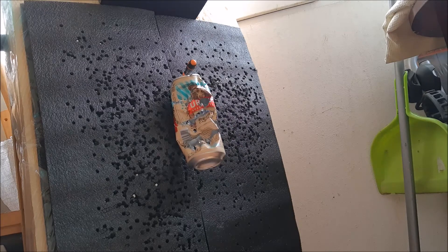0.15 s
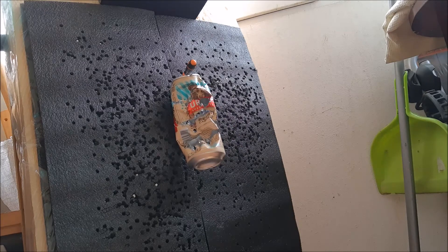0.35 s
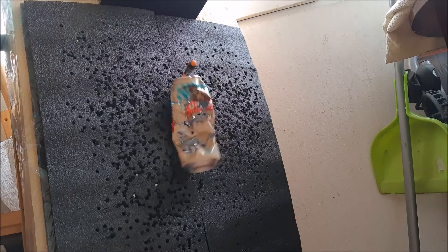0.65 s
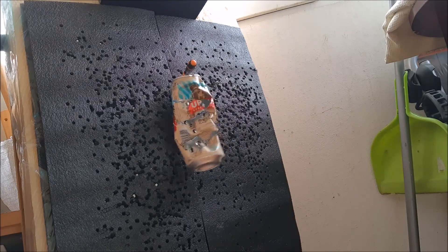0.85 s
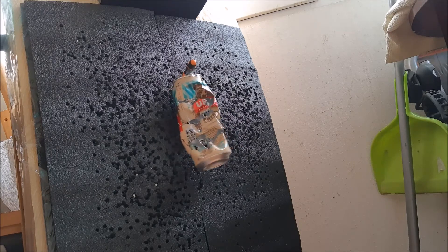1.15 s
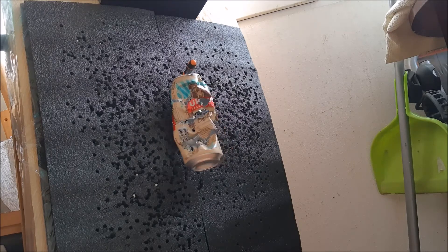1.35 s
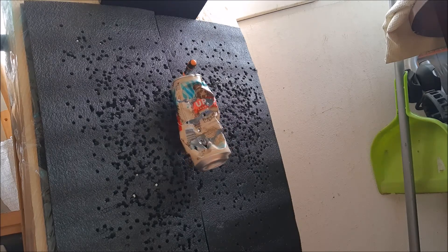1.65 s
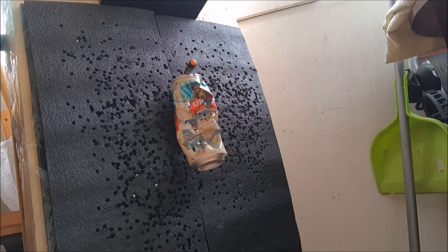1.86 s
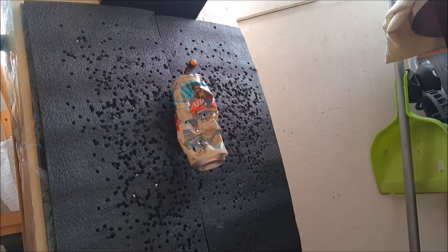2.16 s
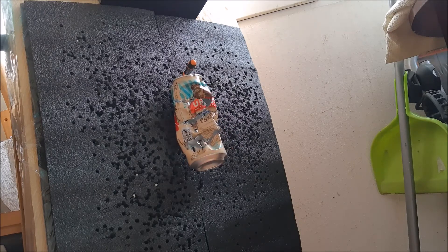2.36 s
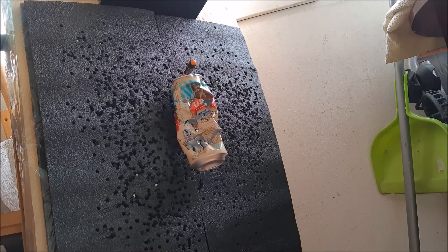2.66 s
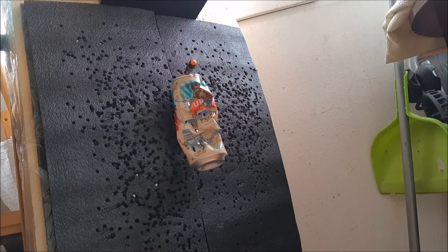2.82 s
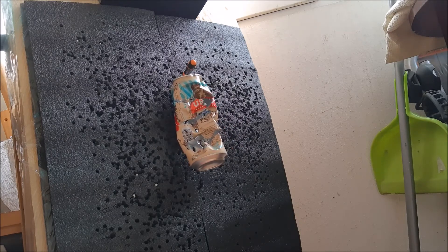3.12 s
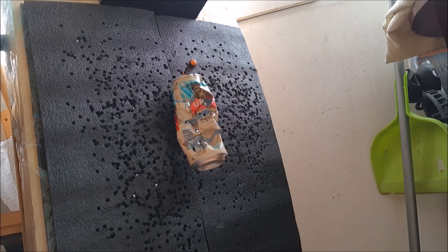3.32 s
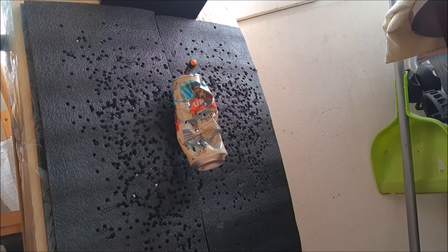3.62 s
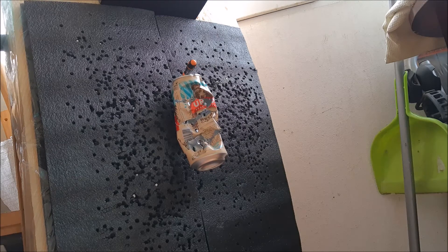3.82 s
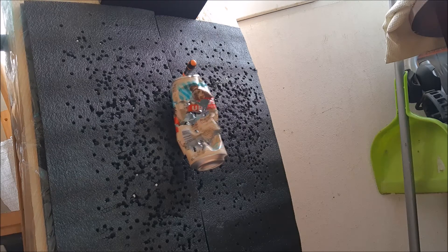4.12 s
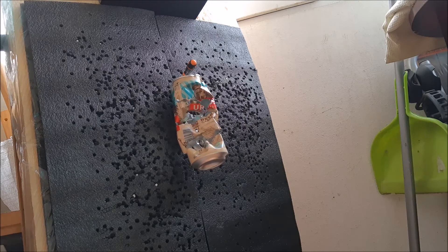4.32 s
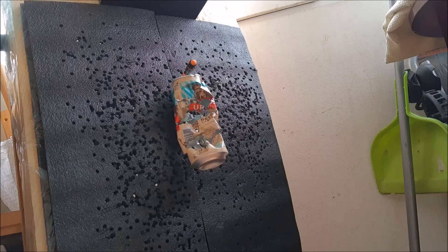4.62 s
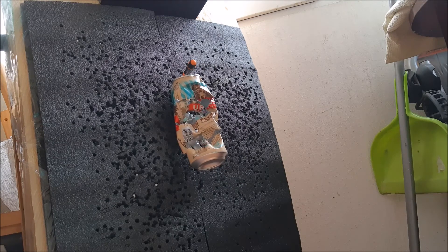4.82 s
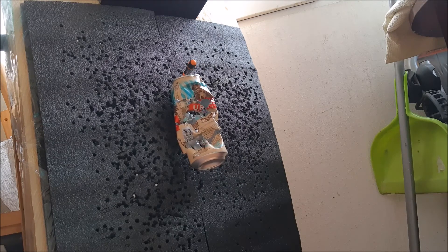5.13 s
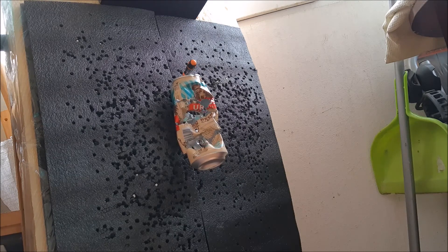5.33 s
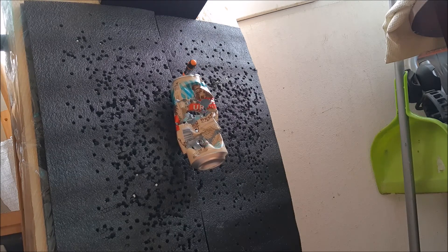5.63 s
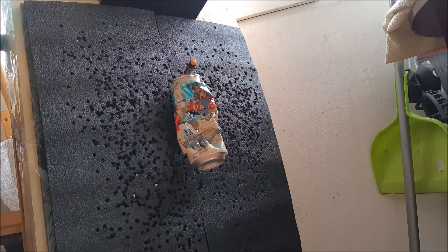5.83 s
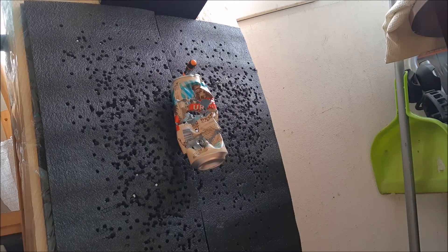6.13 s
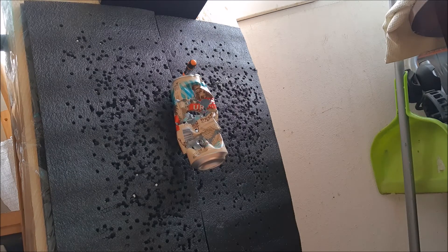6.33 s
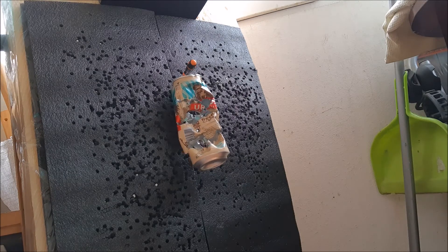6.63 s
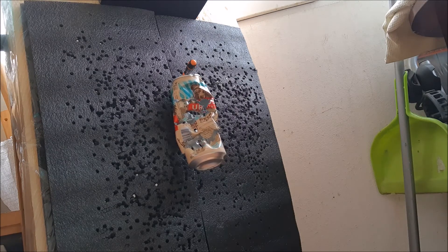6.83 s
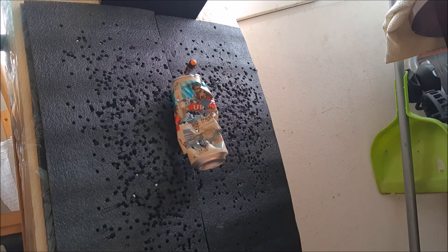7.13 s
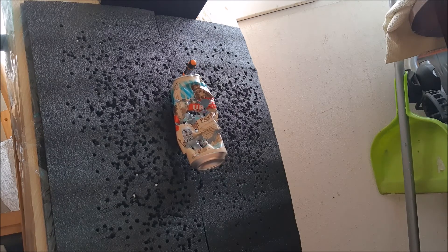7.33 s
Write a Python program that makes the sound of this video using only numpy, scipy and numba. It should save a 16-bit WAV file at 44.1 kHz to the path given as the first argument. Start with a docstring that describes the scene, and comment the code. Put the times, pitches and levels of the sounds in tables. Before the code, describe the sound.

Quiet room tone with a low hum and a few faint clicks opens in a small hard room. At about 0.7 seconds a spring airsoft rifle pops from across the room, and almost instantly the pellet hits a metal can near the microphone with a loud crack, a short clang and a low backstop thump. Scraps rattle brightly inside the can until about 1.2 seconds. Light ticks of bouncing pellets and rifle handling follow, scattered through 3.7 seconds. A barely audible high whine comes and goes between 3 and 4 seconds. The second pop and hit land at 4.2 seconds, followed by more clicks and two soft knocks of a rifle part around 5.5 seconds. The third shot strikes at 6.6 seconds, leaving a slight metallic hum. Each hit briefly overloads the microphone. Faint clicks end it near 7.5 seconds.

```python
"""A spring airsoft rifle fires three pellets across a small hard room at a dented can beside a phone.
Room tone and faint clicks come first. The piston slams with a far pop; 50 ms later the can cracks and
clangs and the backstop thumps. The phone's two spaced ports clip on each hit and its gain ducks.
After the first hit scraps rattle in the can. Pellets bounce and the rifle is handled between shots;
a faint whine comes and goes before the second, and a rifle part knocks twice before the third."""
import sys
import numpy as np
from scipy import signal
from scipy.fft import rfft, irfft
from scipy.io import wavfile
from scipy.ndimage import uniform_filter1d
from numba import njit

SR = 44100
rng = np.random.default_rng(int(sys.argv[2]) if len(sys.argv) > 2 else 0)


def inscribe(sig):
    """Save sig as 16-bit PCM at rate SR to the path in sys.argv[1].

    A 1-D sig is mono; a 2-D sig holds one channel per row.
    Samples are clipped to [-1, 1] before scaling.
    """
    pcm = np.round(np.clip(np.atleast_2d(sig).T, -1, 1) * 32767)
    wavfile.write(sys.argv[1], SR, pcm.astype(np.int16))


N = 329427

# room decay: f/Hz, t60/s
ROOM_T60 = [(60, 0.4), (250, 0.33), (1000, 0.46), (2000, 0.41), (4000, 0.38), (8000, 0.29), (12000, 0.22),
            (14500, .2), (17000, 0.069)]
# likeness of the two ports: f/Hz, share/0-1
PORT_LIKENESS = [(60, 1), (130, .95), (300, 0.91), (700, 0.3), (1500, 0.1), (4000, 0)]
# room tone spectrum: f/Hz, level/dB
AIR_SPECTRUM = [(15, -38.5), (25, -7.5), (107, -5.5), (161, -18), (200, -18.5), (334, -18.5), (404, -14),
                (515, -18), (656, -17), (932, -14), (1990, -26), (2270, -32.5), (11500, -49),
                (12500, -47.5), (15900, -62.5)]
# low noise bands: f/Hz, width/Hz, level/dB
DRONES = [(66, 38, -62.5), (109, 13, -58), (199, 22, -73), (377, 25, -77.5), (453, 37, -68)]
# drone swell: t/s, gain/dB
DRONE_SWELL = [(0, -4), (.5, -5), (2.1, 3.5), (2.5, -4), (3.1, 2), (4.2, 2.5), (5.2, 0.5), (5.9, 3.5),
               (6.5, -0.5), (7.47, 2.5)]
# bounces and handling: t/s, peak/dB, body/dB, top octave/dB, pan L-R/dB, room/dB
CLICKS = [(0.169, -38, -16, -4, -2, -7.5), (0.3482, -42.5, -30, -7, -4, -6),
          (0.4936, -43, -25, -8, -3, -10), (0.608, -43, -31, -10, -6, -5), (1.289, -14, -8, -14, -1.5, -3),
          (1.4572, -41, -26, -32, -21, 9), (1.502, -43, 1.5, -18.5, -12, 15),
          (1.569, -52.5, -10, -34, 10, 9), (1.72, -31, -5.5, -16, -9, 9.5), (1.7555, -36.5, 5, -14, -2, 4),
          (1.8397, -34.5, -2, -28, -7, 16), (1.9017, -21, -8, -12, -2, -3.5),
          (2.3833, -20.5, -12.5, -15.5, -8, -3), (2.569, -43, -13, -15, -9.5, 7.5),
          (2.7028, -40.5, -12, -15.5, -9.5, 11), (2.7572, -21, -12, -16, -7, -3),
          (3.0034, -48, -16.5, -17, -7.5, 5.5), (3.025, -37, -18.5, -9, 1, 3),
          (3.0453, -24, -9.5, -15, -6, 2), (3.2031, -30, -4.5, -21, -8, 8),
          (3.2319, -33.5, 29, -17, -10.5, 2.5), (3.2654, -30, -14, -15, 8, -3),
          (3.4399, -33.5, -24.5, -10, -1, -3.5), (3.556, -40.5, -21.5, -10.5, -12, 5.5),
          (3.671, -54.5, -10, -23, -1, -7), (4.134, -58, -5.5, -18.5, -1.5, 9.5),
          (4.366, -20.5, -30, -12, -2.5, 2), (4.5885, -43.5, -4.5, -11, -0.5, 0),
          (4.6532, -40.5, -16, -18, -1.5, -3), (4.9384, -44.5, 3.5, -20, -3.5, 11),
          (5.0377, -47, -8, -12, -5.5, 9.5), (5.1547, -40, -15, -15, -5, 11.5),
          (5.4133, -44, -19, -10, -11.5, 5.5), (5.4344, -40.5, -22.5, -17.5, -3, 14),
          (5.458, -30, -6, -21.5, 2, 10), (5.625, -44, -9, -17, -7.5, 6),
          (5.6411, -30, 1, -23.5, -2.5, 3.5), (7.115, -52, 3, -17, -5, 18), (7.2749, -48, 10, -25, -11, 13),
          (7.3626, -45.5, -10.5, -14, -13, 15.5)]
# bright click spectrum: f/Hz, level/dB
CLICK_SPECTRUM = [(1470, -13.5), (2500, -8.5), (6100, -3), (8000, -4), (10000, 1.5), (12300, 6.5),
                  (14500, 2.5), (15500, -16), (16000, -19.5)]
# dull click body: f/Hz, level/dB
BODY_SPECTRUM = [(600, -19), (1200, 2), (1800, 2.5), (2800, 0.5), (4000, -4), (6000, -18)]
# rifle shots: t/s, peak/dB, pan L-R/dB
SHOTS = [(0.71, -18, -3.5), (4.1814, -18.5, -4), (6.558, -18.5, -4)]
# piston pop: f/Hz, level/dB
POP_SPECTRUM = [(40, -41), (70, -12), (140, -0.5), (230, -12.5), (530, -4.5), (900, -3.5), (1400, -2.5),
                (2600, -8), (3500, -8.5), (5000, -14), (6500, -7.5), (9500, -8.5), (12500, -11.5),
                (14000, -21.5), (16000, -29.5)]
# pellet on can: t/s, peak/dB, dent f/Hz, dent lift/dB, thump peak/dB, thump f/Hz, hum/dB, pan L-R/dB
HITS = [(0.7611, 14, 1396, 10.5, -8.5, 220, -51, -2), (4.2320, 12.5, 1101, 2, -1, 190, -50.5, -4),
        (6.6083, 10, 2600, 6, -6.5, 168, -30.5, 1.1)]
# first blow: f/Hz, level/dB
SMACK_SPECTRUM = [(100, -25.5), (250, -8.5), (500, -1.5), (1000, -0.5), (2000, -1.5), (3300, -2.5),
                  (5000, -6.5), (9000, -2.5), (12500, -10), (16000, -25.5)]
# tearing sheet, before tilt and dent lift: f/Hz, level/dB
CRACK_SPECTRUM = [(210, -35.5), (350, -7.5), (684, -6.5), (1280, -8.5), (1450, -6), (1700, -10),
                  (1960, -5.5), (3960, -9), (7990, -3.5), (12100, -6), (15900, -32.5)]
# can modes: f/Hz, level/dB, t60/s
CAN_MODES = [(940, -5.5, 0.17), (1040, -1.5, 0.089), (1200, -6, 0.09), (1366, -2.5, 0.12), (1470, -4, 0.14),
             (1597, 1, 0.062), (1649, -3.5, 0.068), (1790, -0.5, 0.091), (2018, -10.5, 0.2),
             (2187, -4.5, 0.11), (2300, -2.5, 0.23), (2600, 0.5, .08), (2950, 0.5, 0.058),
             (3127, -5.5, .08), (3343, -11, .08), (3627, -1, .08)]
# backstop modes: f/Hz, level/dB, t60/s
BACKSTOP_MODES = [(45.5, 1.5, 0.095), (81, -2.5, .09), (133.5, -2, .07), (172, -7, .05), (258, 6, 0.032),
                  (315, -2.5, .05)]
# scrap on the can wall: f/Hz, level/dB
SCRAP_SPECTRUM = [(1500, -26), (2500, -9.5), (3500, -12), (4600, -4.5), (5800, -6.5), (7800, 1),
                  (9500, 0.5), (11000, -3), (13500, -13), (16000, -30)]
# can wall resonances: f/Hz, lift/dB
SCRAP_RESONANCES = [(2400, -3), (4450, 4), (5300, 2), (7600, 5.5), (8800, 0), (10700, 3.5)]
# single scrap strikes: t/s, peak/dB, pan L-R/dB, room/dB
SCRAP_TICKS = [(0.889, -11, 5, -2), (0.9341, -11, 0.5, -2), (0.96, -11.5, 2.5, 2.5), (0.984, -15, 6, 2),
               (0.9981, -11, 1, 1.5), (1.0107, -18, 7, 7), (1.069, -14, 0.5, 5), (1.0826, -20.5, 5, 10),
               (1.1592, -17.5, 18.5, 5)]
# short rings: the can during the rattle, loose parts later: t/s, f/Hz, peak/dB
SHORT_RINGS = [(1.005, 2400, -33), (1.11, 4940, -32), (1.73, 815, -42), (3.21, 5000, -46), (3.21, 3300, -49)]
# rifle latch modes: f/Hz, level/dB
LATCH_MODES = [(1600, 0), (3300, -2)]
# latch knocks: t/s, peak/dB
LATCH_KNOCKS = [(5.459, -43), (5.643, -39)]

TIME_S = np.arange(N) / SR
AGE_S = np.arange(int(.7 * SR)) / SR
IMPULSE = 1. * (AGE_S == 0)


def undb(db):
    return 10 ** (np.asarray(db) / 20)


def along(table, hz):
    """Table lookup on a log-frequency axis."""
    f, value = np.transpose(table)
    return np.interp(np.log(np.maximum(hz, 1)), np.log(f), value)


def hump(hz, centre_hz, octaves):
    """Bell of height 1 on a log-frequency axis."""
    return np.exp(-(np.log2(np.maximum(hz, 1) / centre_hz) / octaves) ** 2)


def plateau_db(from_s, to_s, rise_db_s, fall_db_s):
    """0 dB between two times, sloping away outside."""
    return -rise_db_s * np.maximum(from_s - TIME_S, 0) - fall_db_s * np.maximum(TIME_S - to_s, 0)


def unit_rms(x):
    return x / np.sqrt(np.mean(x ** 2))


def colour(x, gain):
    """Minimum-phase filter of amplitude gain(Hz)."""
    cepstrum = irfft(np.log(gain(np.fft.rfftfreq(4096, 1 / SR)) + 1e-9))
    cepstrum[1:2048] *= 2
    cepstrum[2049:] = 0
    response = irfft(np.exp(rfft(cepstrum)))[:2048]
    return signal.fftconvolve(x, response)[:len(x)]


def pulse(spectrum):
    return colour(IMPULSE, lambda f: undb(along(spectrum, f)))


def shaped_noise(gain, rows):
    return irfft(rfft(rng.standard_normal((rows, N))) * gain(np.fft.rfftfreq(N, 1 / SR)), N)


def waver(rate_hz):
    """Random steps, smoothed twice."""
    hold = int(SR / rate_hz)
    steps = np.repeat(rng.standard_normal(N // hold + 1), hold)
    return np.sqrt(2) * uniform_filter1d(uniform_filter1d(steps, hold), hold)[:N]


def fade(t60_s):
    return np.exp(-np.log(1000) * AGE_S / t60_s)


def ring(hz, t60_s, phase=0):
    return np.sin(2 * np.pi * hz * AGE_S + phase) * fade(t60_s)


def clatter(decay_ms):
    """Close reflections and loose parts: decaying noise, mean energy 1 per port."""
    noise = rng.standard_normal((2, len(AGE_S))) * np.exp(-AGE_S * 1000 / decay_ms)
    return noise / np.sqrt(np.sum(noise ** 2) / 2)


def echoes(build_s=.004):
    """Diffuse room tail, mean energy 1 per port; each band dies at its own rate."""
    hz = np.fft.rfftfreq(len(AGE_S), 1 / SR)
    noise = rng.standard_normal((3, len(AGE_S)))
    share = along(PORT_LIKENESS, hz) ** 2
    ports = np.sqrt(share) * rfft(noise[0]) + np.sqrt(1 - share) * rfft(noise[1:])
    tail = 0
    for centre_hz, t60_s in ROOM_T60:
        band = along([(f, f == centre_hz) for f, _ in ROOM_T60], hz)
        tail += irfft(ports * band, len(AGE_S)) * fade(t60_s)
    tail *= 1 - np.exp(-AGE_S / build_s)
    return tail / np.sqrt(np.sum(tail ** 2) / 2)


def at_ports(sound, pan_db, decay_ms, clatter_db, room_db, lag_ms=.18):
    """Direct sound (left port late), close clatter, then the room; room_db is re the clatter."""
    direct = np.array([np.roll(IMPULSE, int(lag_ms * SR / 1000)), IMPULSE])
    near = (direct + undb(clatter_db) * clatter(decay_ms)) * undb([[pan_db / 2], [-pan_db / 2]])
    path = near + undb(clatter_db + room_db) * echoes()
    return signal.fftconvolve(sound[None], path, axes=1)[:, :len(AGE_S)]


def add(out, t_s, sound, peak_db):
    start = int(t_s * SR)
    out[:, start:start + len(AGE_S)] += (sound * undb(peak_db) / np.abs(sound).max())[:, :N - start]


def room_tone(air_db=-53, lag_ms=.35):
    """Noise from one side plus a diffuse part; low drones swell and waver."""
    def port_noise(gain):
        common = shaped_noise(lambda f: gain(f) * np.sqrt(along(PORT_LIKENESS, f)), 1)[0]
        diffuse = shaped_noise(lambda f: gain(f) * np.sqrt(1 - along(PORT_LIKENESS, f)), 2)
        sided = np.array([np.roll(common, int(lag_ms * SR / 1000)), common])
        return unit_rms(sided + diffuse)
    bed = port_noise(lambda f: undb(along(AIR_SPECTRUM, f))) * undb(air_db + .8 * waver(3.7))
    swell_db = np.interp(TIME_S, *np.transpose(DRONE_SWELL))
    for hz, width_hz, db in DRONES:
        drone = port_noise(lambda f: 1 / (1 + (2 * (f - hz) / width_hz) ** 2))
        bed += drone * undb(db + swell_db + 1.3 * waver(5.5))
    return bed * undb([[.8], [-.8]])


def clicks(out, wall_ms=13, wall_db=-11):
    """Rifle handling and pellet bounces: bright tick over a dull body, echoed by a near wall."""
    for t_s, db, body_db, top_db, pan_db, room_db in CLICKS:
        def gain(f):
            bright_db = along(CLICK_SPECTRUM, f) + top_db * hump(f, 13720, .47) + 4 * hump(f, 10200, .27)
            return undb(bright_db) + undb(body_db + along(BODY_SPECTRUM, f))
        tick = colour(IMPULSE, gain)
        echo = undb(wall_db) * np.roll(tick, int(wall_ms * SR / 1000))
        add(out, t_s, at_ports(tick + echo, pan_db, 6.7, 24, room_db), db)


def rifle(out):
    """The piston slides, then slams with a pop heard mostly through the room; the spring buzzes on."""
    pop, snap = pulse(POP_SPECTRUM), pulse(CLICK_SPECTRUM)
    for t_s, db, pan_db in SHOTS:
        add(out, t_s - .007, at_ports(pop, pan_db, 15, 19, -12), db - 6)  # slide
        add(out, t_s, at_ports(pop, pan_db, 1.5, 5.2, 21), db)  # slam
        add(out, t_s + .0019, at_ports(snap, pan_db, .8, 7.3, -6), db)
        add(out, t_s + .023, at_ports(pop, pan_db, 45, 25, -4), db - 1.5)  # spring


def can_crack(dent_hz, dent_db, tilt_db_oct=1.44):
    """The sheet tears: a broad pulse, lifted at the struck dent's pitch."""
    def gain(f):
        tilt_db = tilt_db_oct * np.log2(np.maximum(f, 100) / 3000)
        return undb(along(CRACK_SPECTRUM, f) + tilt_db + dent_db * hump(f, dent_hz, .62))
    return colour(IMPULSE, gain)


def can_clang(dent_hz, split=.012):
    """Modes near the struck dent's pitch ring most; dents split each in two."""
    clang = 0
    for hz, db, t60_s in CAN_MODES:
        loudness, detune = rng.standard_normal(2)
        pair = ring(hz * (1 + .013 * detune), t60_s) + ring(hz * (1 + .016 * detune + split), t60_s)
        clang += undb(db + 3 * loudness) * hump(hz, dent_hz, .47) * pair
    return clang


def backstop_thump(centre_hz, rise_s=.003):
    """Low modes shake the phone: each port at its own phase, the right one more."""
    thump = 0
    for hz, db, t60_s in BACKSTOP_MODES:
        phases = 1.6 * rng.standard_normal((2, 1))
        thump += undb(db) * hump(hz, centre_hz, 2.3) * ring(hz, t60_s, phases)
    return thump * (1 - np.exp(-AGE_S / rise_s)) * undb([[-5], [0]])


def can_hum(hz=912, t60_s=.9, beat_hz=9, twin_db=-10):
    """The dented wall splits the hum into a beating pair."""
    return ring(hz, t60_s) + undb(twin_db) * ring(hz + beat_hz, t60_s)


def hits(out):
    """A pellet smacks the can, which cracks, clangs and hums; the backstop thumps."""
    smack = pulse(SMACK_SPECTRUM)
    for t_s, db, dent_hz, dent_db, thump_db, thump_hz, hum_db, pan_db in HITS:
        crack, clang = can_crack(dent_hz, dent_db), can_clang(dent_hz)
        add(out, t_s, at_ports(smack, pan_db, 11, 25, -14, lag_ms=.1), db)
        add(out, t_s, at_ports(crack, pan_db, 16, 6, -1.5, lag_ms=.1), db - 1.5)
        add(out, t_s, at_ports(clang, pan_db, 1, 3, -7.5, lag_ms=.1), db + dent_db - 16)
        add(out, t_s, backstop_thump(thump_hz), thump_db)
        add(out, t_s, at_ports(can_hum(), pan_db, .8, -7.5, -10.5), hum_db)


def scrap_gain(hz):
    """Spectrum of a scrap against the resonant can wall."""
    lift_db = sum(db * hump(hz, f, octaves=.09) for f, db in SCRAP_RESONANCES)
    return undb(along(SCRAP_SPECTRUM, hz) + lift_db)


def scrap_rattle(grains_per_s=1200, level_db=-42.5):
    """Scraps rattle in the swinging can: dense uneven grains, smeared by the hollow."""
    grains = (rng.random(N) < grains_per_s / SR) * undb(3 * rng.exponential(size=N))
    smeared = signal.fftconvolve(grains[None], clatter(1.4), axes=1)[:, :N]
    rough = smeared * rng.standard_normal((2, N))
    rattle = np.array([unit_rms(colour(port, scrap_gain)) for port in rough])
    return rattle * undb(level_db + plateau_db(.96, 1.15, rise_db_s=90.5, fall_db_s=493))


def scrap_ticks(out):
    """Single scraps strike the can wall."""
    tick = colour(IMPULSE, scrap_gain)
    for t_s, db, pan_db, room_db in SCRAP_TICKS:
        add(out, t_s, at_ports(tick, pan_db, 5.4, 26, room_db), db)


def mode_cluster(hz, spread=.04, t60_s=.06):
    """Nine close modes that beat."""
    draws = rng.standard_normal((9, 2))
    return sum(ring(hz * (1 + spread * detune), t60_s, 3 * phase) for detune, phase in draws)


def short_rings(out):
    """The can during the rattle, and later loose parts, ring briefly and roughly."""
    for t_s, hz, db in SHORT_RINGS:
        add(out, t_s, at_ports(mode_cluster(hz), -2, 22, 14, -8), db)


def whine(hz=12050, level_db=-85.5):
    """A faint thin tone comes, flickers and goes."""
    gate_db = plateau_db(2.9, 4.15, rise_db_s=100, fall_db_s=100)
    return np.sin(2 * np.pi * hz * TIME_S) * undb(level_db + gate_db + 3 * waver(15))


def latch(out):
    """A rifle part knocks, ringing in two mode clusters."""
    for t_s, peak_db in LATCH_KNOCKS:
        knock = sum(undb(db) * mode_cluster(hz) for hz, db in LATCH_MODES)
        add(out, t_s, at_ports(knock, -2, 4, 3, 2), peak_db)


def scene():
    out = room_tone() + whine() + scrap_rattle()
    for source in (rifle, hits, scrap_ticks, clicks, short_rings, latch):
        source(out)
    return out


@njit
def follow(x, attack_s, release_s):
    """One-pole level follower."""
    levels, level = np.empty(len(x)), x[0]
    for i in range(len(x)):
        level += (x[i] - level) / (SR * (attack_s if x[i] > level else release_s))
        levels[i] = level
    return levels


def record(dry):
    """Phone: gain ducks after loud sounds and creeps back; peaks clip; the top is cut."""
    threshold_db, max_duck_db, top_hz = -34, 6.5, 16050
    level = follow(np.abs(dry).max(axis=0) + 1e-9, attack_s=.021, release_s=.19)
    duck_db = np.clip(.5 * (20 * np.log10(level) - threshold_db), 0, max_duck_db)
    clipped = np.clip(dry * undb(-duck_db), -.97, .97)
    return signal.sosfilt(signal.ellip(12, .2, 90, top_hz, fs=SR, output="sos"), clipped)


dry = scene()
out = record(dry)
inscribe(out)
```